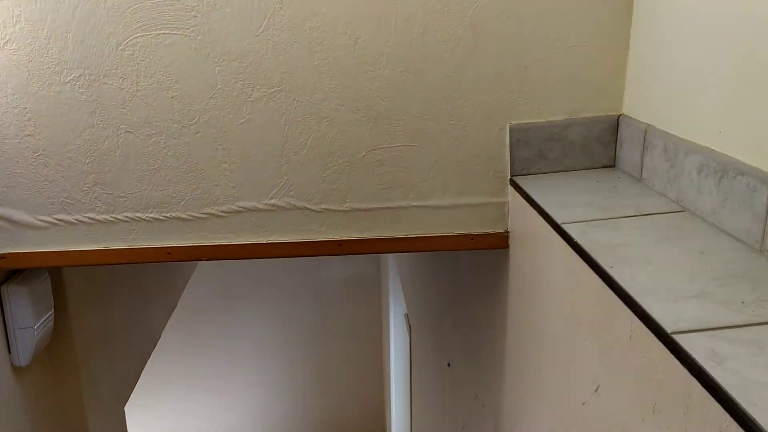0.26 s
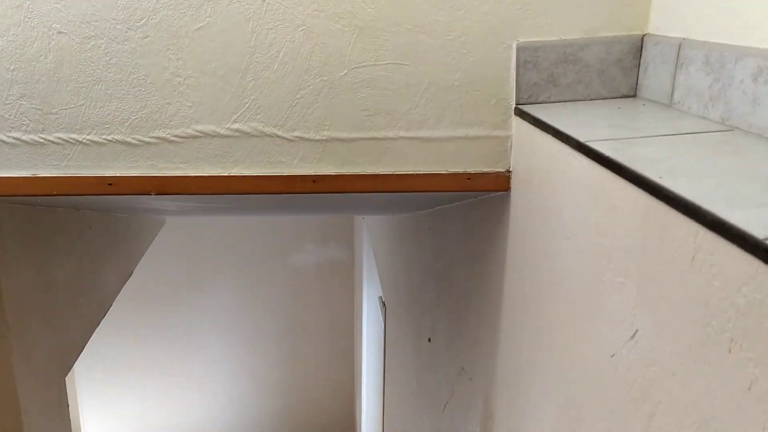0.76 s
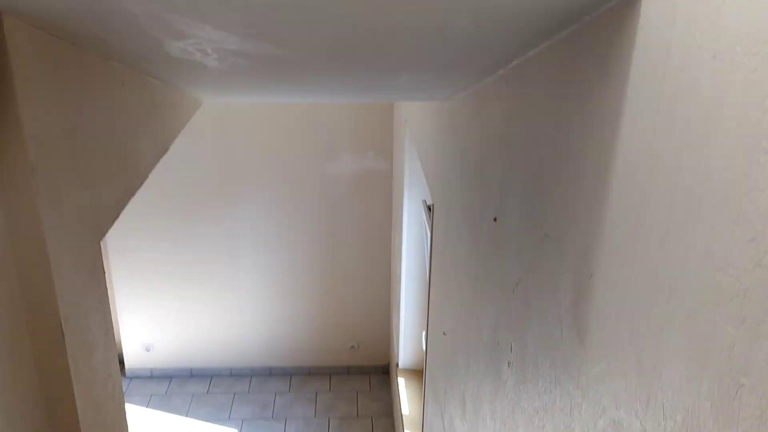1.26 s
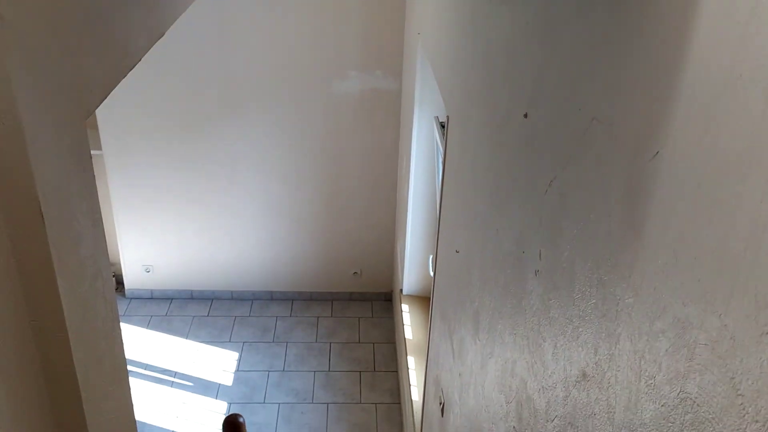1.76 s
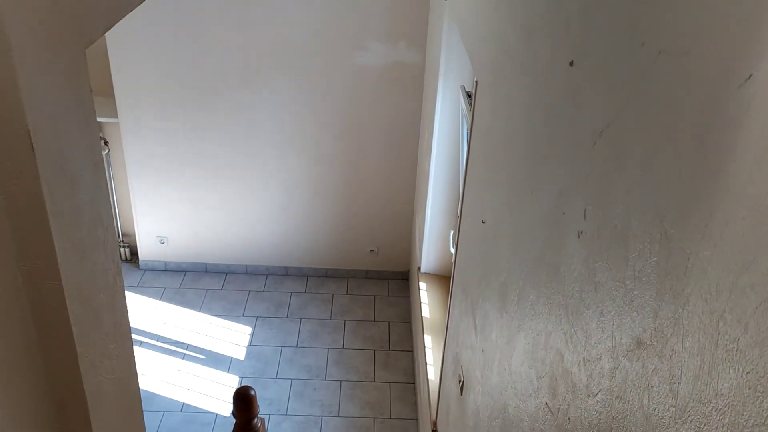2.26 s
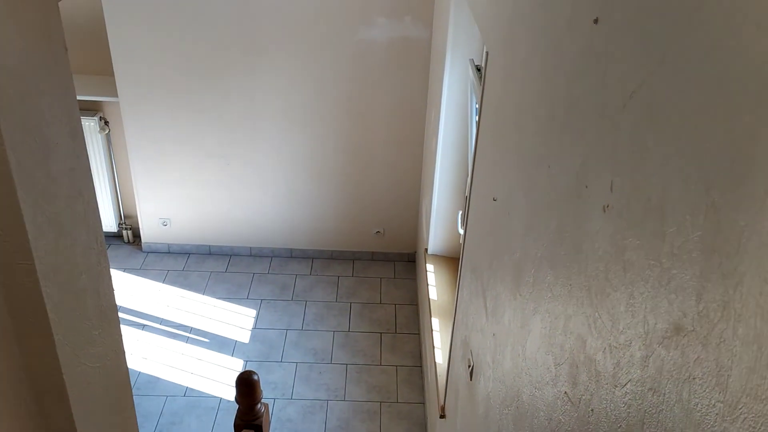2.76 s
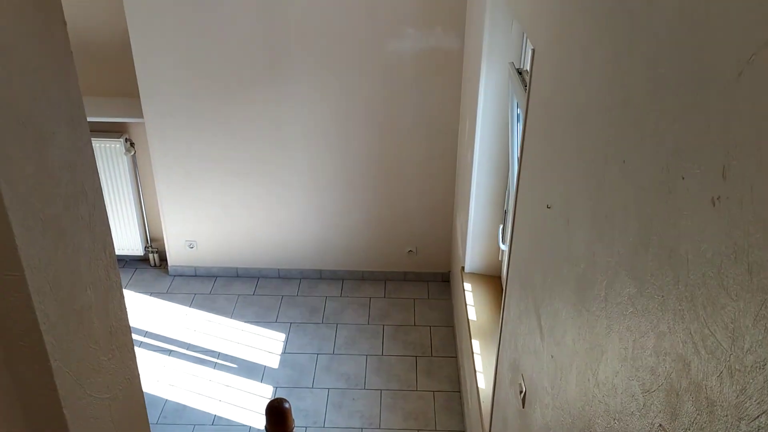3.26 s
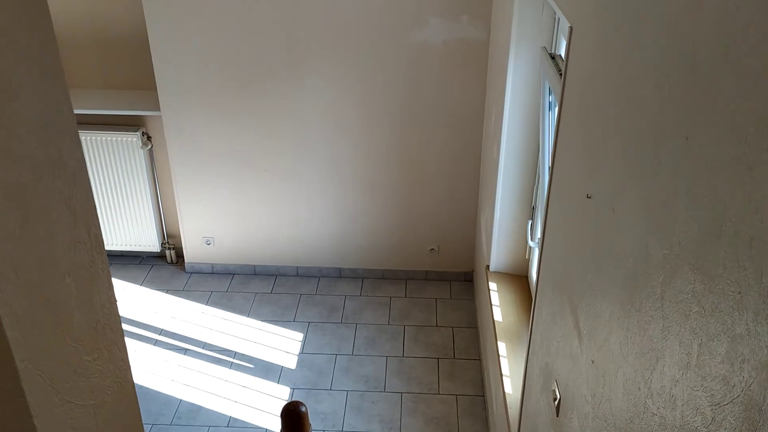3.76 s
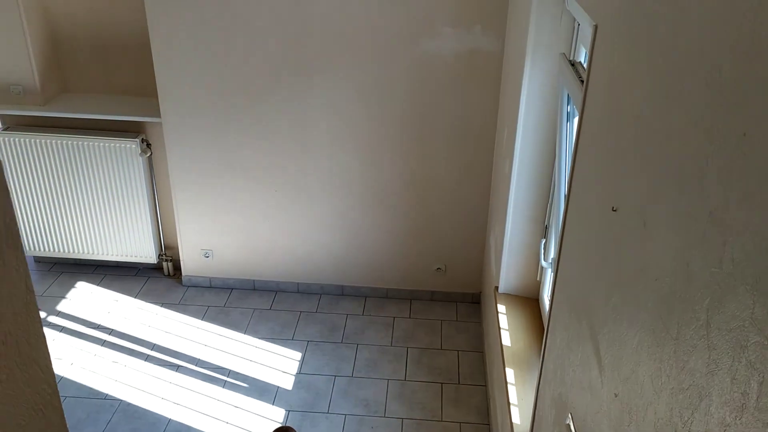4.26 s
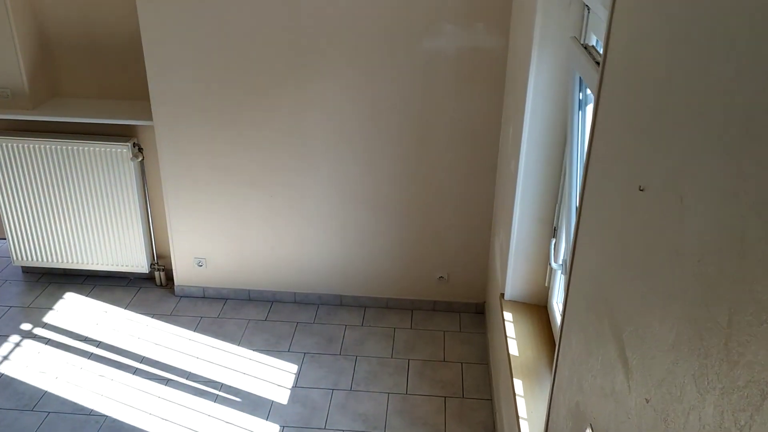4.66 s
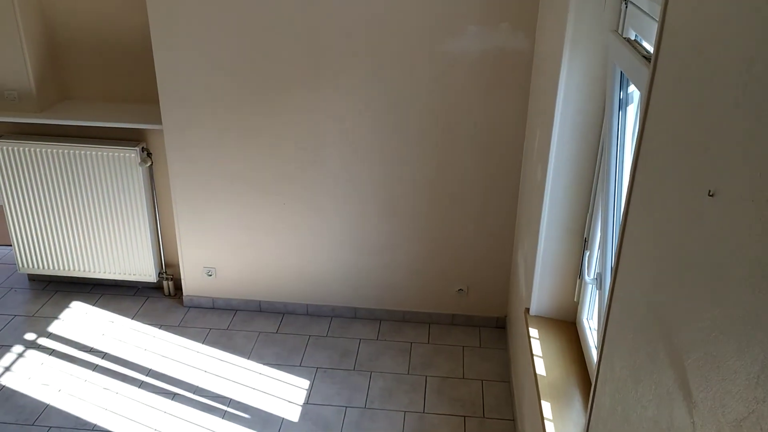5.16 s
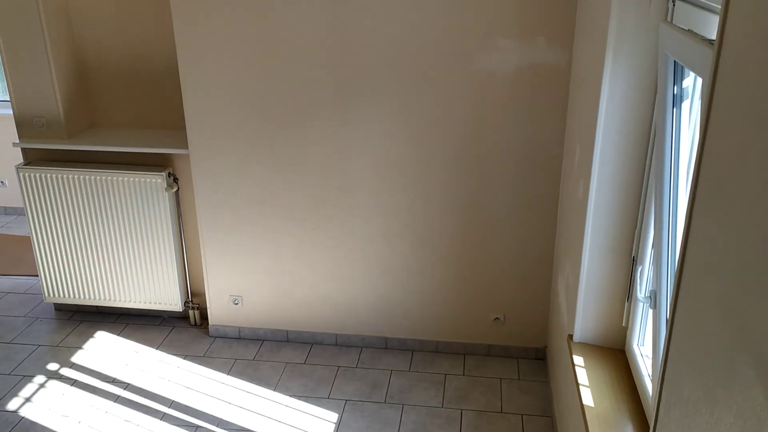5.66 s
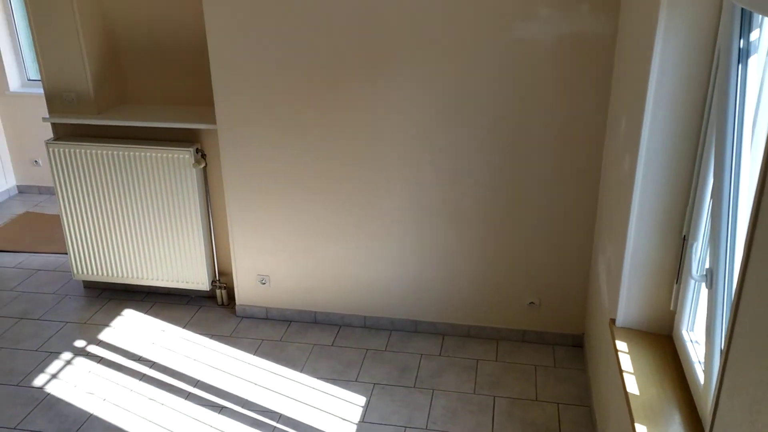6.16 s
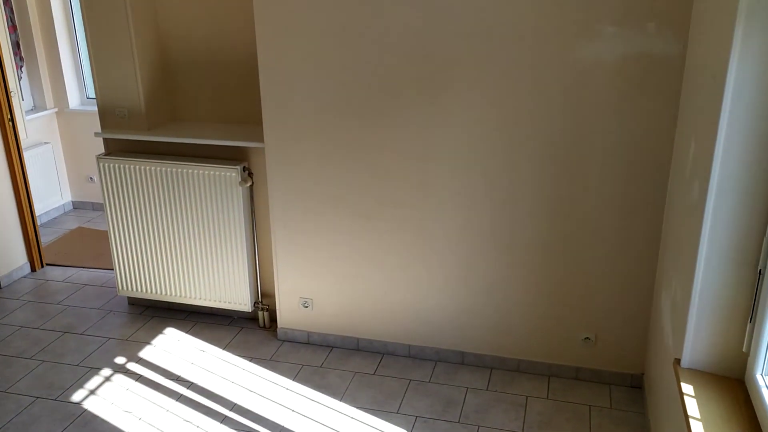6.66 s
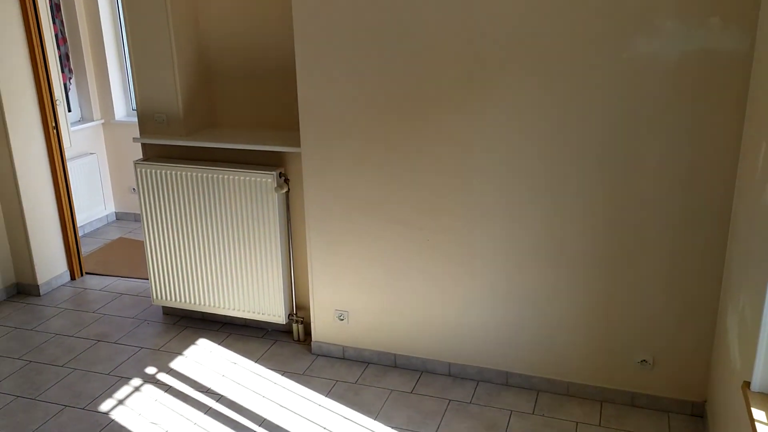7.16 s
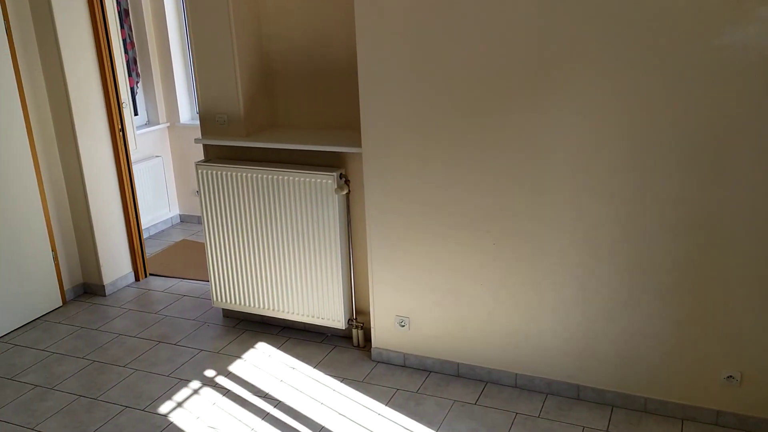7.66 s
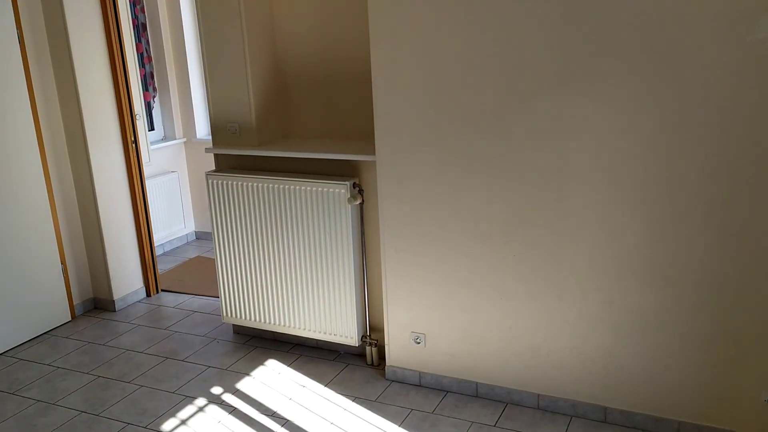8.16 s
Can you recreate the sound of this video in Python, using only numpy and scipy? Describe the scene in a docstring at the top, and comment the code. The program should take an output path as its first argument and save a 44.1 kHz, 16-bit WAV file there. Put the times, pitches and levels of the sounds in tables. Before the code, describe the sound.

Slow shoe steps descend a tiled staircase in a bare, echoing stairwell, toe tap then dull heel knock, with trouser swish and a tiny early metal clink.

```python
"""A bare, echoing stairwell with hard floor and walls close by, heard through a pair of microphones.
Someone walks slowly down its tiled staircase: a bright tap of the toe and, some 40 ms later, the dull
knock of the heel, each a shaped pulse sent through echoes of decaying noise; tread, shoe and tile ring.
Trousers swish as filtered noise with each swing of the leg; the shoes tick, scuff and thud softly.
Early on, a small piece of metal is struck, two light ticks and a clink of a few decaying sines; quiet
house noise lies underneath."""
import sys
import numpy as np
from scipy import signal
from scipy.fft import rfft, irfft, next_fast_len
from scipy.io import wavfile
from scipy.ndimage import uniform_filter1d

SR = 44100
rng = np.random.default_rng(int(sys.argv[2]) if len(sys.argv) > 2 else 0)


def to_wav(sig):
    """Store sig (one row per channel, or 1-D mono) as 16-bit WAV at the path in sys.argv[1].

    Samples outside -1..1 are clipped; the rate is SR.
    """
    pcm = np.clip(np.atleast_2d(sig), -1, 1) * 32767
    pcm = np.round(pcm).astype(np.int16)
    wavfile.write(sys.argv[1], SR, pcm.T)  # frames by channels


N = 370652
PULSE_SIZE, TAIL_SIZE = 8192, 32768   # samples in a contact pulse and in an echo response


def from_db(db):
    """Amplitude factor of a level in dB."""
    return 10 ** (np.asarray(db) / 20)


def at_hz(points, hz):
    """Read (f/Hz, value) points on a log-frequency axis."""
    points = np.array(points)
    return np.interp(np.log(hz + 1e-6), np.log(points[:, 0]), points[:, 1])


def bins(size):
    """Frequencies in Hz of a real spectrum."""
    return np.arange(size // 2 + 1) * SR / size


def add(out, s, sound):
    """Mix a stereo sound in at time s; whatever falls before the start is cut off."""
    start = round(s * SR)
    part = sound[:, max(-start, 0):N - start]
    first = max(start, 0)
    out[:, first:first + part.shape[1]] += part


def uneven(count, size):
    """A smooth random row of spread 1."""
    row = uniform_filter1d(rng.standard_normal(count), size)
    row = uniform_filter1d(row, size)
    return row / row.std()


# width of the sound field at the microphone pair: f/Hz, side over mid/dB
FIELD_WIDTH = [(60, -15.5), (125, -27), (250, -10), (500, -8.5), (1000, 0.5), (2000, 0.5), (12000, 0)]


def diffuse(size):
    """Spectrum of white noise arriving from all sides: nearly alike in both channels in the bass only."""
    mid, side = rfft(rng.standard_normal((2, size)))
    side_gain = from_db(at_hz(FIELD_WIDTH, bins(size)))
    return mid + side * side_gain * np.array([[1], [-1]])


def coloured_noise(spectrum):
    """Diffuse noise with the given spectrum; its mid has rms 1."""
    size = next_fast_len(N)
    shaped = diffuse(size) * from_db(at_hz(spectrum, bins(size)))
    noise = irfft(shaped, size)[:, :N]
    return noise / noise.mean(axis=0).std()


def pulse(gain_db):
    """The most compact causal pulse with this spectrum (minimum phase)."""
    cepstrum = irfft(np.log(from_db(gain_db)))
    # fold the cepstrum onto positive times
    cepstrum[1:PULSE_SIZE // 2] *= 2
    cepstrum[PULSE_SIZE // 2 + 1:] = 0
    return irfft(np.exp(rfft(cepstrum)))


def dying(t, t60):
    """Exponential decay of unit energy, falling 60 dB in t60 seconds."""
    fall = np.exp(-np.log(1000) * t / t60)
    return fall / np.sqrt(np.sum(fall ** 2))


def resonance(hz, width_hz, height_db):
    """A resonance, as a bump in dB."""
    offset = (bins(PULSE_SIZE) - hz) / (width_hz / 2)
    return height_db / (1 + offset ** 2)


def ripple(depth_db):
    """Many weak resonances, different at every contact and fading out in the bass."""
    hz = bins(PULSE_SIZE)
    return depth_db * uneven(len(hz), size=30) * hz / (hz + 600)


def slap(level_db, t60, low_hz):
    """Surfaces meet patch by patch: a short burst of dying noise above low_hz."""
    burst = irfft(diffuse(TAIL_SIZE), TAIL_SIZE) * dying(np.arange(TAIL_SIZE) / SR, t60)
    low_cut = signal.butter(2, low_hz, "high", fs=SR, output="sos")
    return from_db(level_db) * signal.sosfilt(low_cut, burst + 1e-18)


# the stairwell by band: f/Hz, early echoes/dB, early t60/s, late tail/dB, tail t60/s
STAIRWELL_BANDS = [(60, -2, 0.24, -2.5, 0.84), (125, 0, 0.28, -5, 0.65), (224, -2.5, 0.17, -7.5, 0.68),
                   (530, -2.5, 0.11, -3.5, 0.8), (1130, -5, 0.27, -3.5, 1), (2210, -7.5, 0.14, -2, 1),
                   (4400, -7, 0.14, -1, 0.88), (9150, -5.5, 0.2, -4.5, 0.95), (14100, 0, 0.14, -18, 0.31)]
# hard floor and walls close by, roughly 1 to 3.6 m of extra path: delay/s, level/dB
NEAR_SURFACES = [(.0028, -9.5), (.0046, -2), (0.0105, -1.5)]


def stairwell(direct_db, early_db, tail_db, pan_db, build_s=.011, modes_db=2.0):
    """Response from one spot: straight sound, first reflections, a flurry off the walls, then a long tail."""
    t, pitch = np.arange(TAIL_SIZE) / SR, np.log(bins(TAIL_SIZE) + 1)
    # each spot excites some standing waves more than others
    field = diffuse(TAIL_SIZE) * from_db(modes_db * uneven(len(pitch), size=8))
    out, build_up = np.zeros((2, TAIL_SIZE)), 1 - np.exp(-t / build_s)
    centres = np.log(np.array(STAIRWELL_BANDS)[:, 0])
    for own, (_, near_db, near_t60, far_db, far_t60) in zip(np.eye(len(STAIRWELL_BANDS)), STAIRWELL_BANDS):
        # neighbouring bands crossfade
        band = irfft(field * np.interp(pitch, centres, own), TAIL_SIZE)
        early = from_db(early_db + near_db) * dying(t, near_t60)
        tail = from_db(tail_db + far_db) * dying(t, far_t60) * build_up
        out += band * (early + tail)
    out[:, 0] += from_db(direct_db + np.array([pan_db, -pan_db]) / 2)
    for delay_s, level_db in NEAR_SURFACES:
        # paths change from contact to contact and reach the two microphones a little apart
        lag = SR * delay_s * rng.uniform(.85, 1.15) + rng.uniform(-10.0, 6, 2)
        out[[0, 1], np.abs(lag).astype(int)] += from_db(direct_db + level_db)
    return out


def broad_colour(response):
    """Level of a response in dB, averaged over narrow bands."""
    power = np.cumsum(np.abs(rfft(response.mean(axis=0))) ** 2)
    hz, fine = bins(PULSE_SIZE), bins(TAIL_SIZE)
    reach = 12 + .05 * hz
    low, high = np.maximum(hz - reach, 0), np.minimum(hz + reach, SR / 2)
    band_power = np.interp(high, fine, power) - np.interp(low, fine, power)
    mean = band_power / ((high - low) / fine[1])
    return 10 * np.log10(mean + 1e-12)


# resonances of the staircase that colour every contact: f/Hz, width/Hz, height/dB
STAIRCASE_RESONANCES = [(108.4, 19, 3.5), (202.5, 4.5, 2), (281.5, 48, 2.5), (468, 70, 2.5), (630, 134, 2),
                        (2410, 200, 1.5), (3650, 490, 2.5)]


def blow(gain_db, response):
    """One contact at the microphones: echoes spread it in time, gain_db and the staircase set its colour."""
    staircase_db = sum(resonance(*mode) for mode in STAIRCASE_RESONANCES)
    heard_db = gain_db + staircase_db - broad_colour(response)
    return -signal.fftconvolve(response, pulse(heard_db)[None], axes=1)   # the pressure dips first


def shelves(weight_db, bass_hz, hardness_db, treble_hz, top_hz):
    """Weight on the foot lifts the bass, a hard landing the treble up to top_hz; in dB."""
    corners = (bass_hz, treble_hz, top_hz)
    bass, below_treble, below_top = (1 / (1 + (bins(PULSE_SIZE) / hz) ** 4) for hz in corners)
    return weight_db * bass + hardness_db * (below_top - below_treble)


# echo against straight sound; it dips, then grows as the narrow stairs open into the room: t/s, level/dB
ECHO_OPENNESS = [(0.4, -0.5), (2.0, -3.5), (5.5, -3), (6.3, 1), (7.9, 4)]


def footfalls(table, spectrum, bass_hz, treble_hz, top_hz, boom_db, boom_width_hz,
              shoe_hz, shoe_db, shoe_width_hz, ring_db, ring_q, ripple_db, slap_db, slap_t60,
              direct_db, early_db, tail_db, echo_share, pan_db):
    """Weight and hardness colour each landing; the tread booms, shoe and tile ring."""
    out, hz = np.zeros((2, N)), bins(PULSE_SIZE)
    usual_db = at_hz(spectrum, hz) + resonance(shoe_hz, shoe_width_hz, shoe_db)
    for s, level_db, weight_db, hardness_db, boom_hz, *rings_hz in table:
        gain_db = usual_db + level_db + ripple(ripple_db)
        gain_db += shelves(weight_db, bass_hz, hardness_db, treble_hz, top_hz)
        gain_db += resonance(boom_hz, boom_width_hz, boom_db)
        gain_db += sum(resonance(ring_hz, ring_hz / ring_q, ring_db) for ring_hz in rings_hz)
        # the open room gives less straight sound and more echo
        echo_db = echo_share * np.interp(s, *np.transpose(ECHO_OPENNESS))
        response = stairwell(direct_db - echo_db, early_db, tail_db + echo_db / 2, pan_db)
        response += slap(slap_db - echo_db, slap_t60, low_hz=360)
        add(out, s, blow(gain_db, response))
    return out


# heel landings, the first just before the start:
# t/s, level/dB, weight as bass/dB, hardness as treble/dB, tread boom f/Hz, lower and upper tile ring f/Hz
HEEL_LANDINGS = [(-0.13, -3.5, -7, 10, 200, 1100, 1390), (0.399, -4.5, -1, 0, 176, 720, 1090),
                 (1.137, 3, -1, -3, 206, 746, 1190), (2.0703, .5, 1, 1.5, 218, 710, 1790),
                 (3.1112, 1, 5, -2.5, 224, 654, 2460), (4.002, 1.5, 5, 1.4, 109, 774, 1043),
                 (4.7442, 2.5, 2.5, 3, 190, 1040, 2220), (5.509, 3.5, 0, 3, 211, 477, 2120),
                 (6.315, 1.5, -3, 4, 277, 910, 1440), (7.1982, -2, -7, 1.2, 327, 714, 1206),
                 (7.9735, -0.5, -6, -3.5, 196, 807, 1420)]
# colour of a usual knock: f/Hz, level/dB
HEEL_COLOUR = [(30, 13), (55, 21), (110, 26.5), (220, 31), (390, 20.5), (700, 17.5), (1250, 17.5),
               (1700, 7.5), (2400, 5), (3200, -4.5), (5500, -13), (10000, -11), (13000, -15.5),
               (16000, -32)]


def heels():
    """The rubber heel comes down under the full weight: a dull knock."""
    return footfalls(HEEL_LANDINGS, HEEL_COLOUR, bass_hz=170, treble_hz=1450, top_hz=5500,
                     boom_db=3.5, boom_width_hz=41, shoe_hz=1280, shoe_db=1.0, shoe_width_hz=140,
                     ring_db=5.0, ring_q=16.7, ripple_db=3.0, slap_db=-8.0, slap_t60=0.038,
                     direct_db=-11, early_db=-2.5, tail_db=-2.5, echo_share=.98, pan_db=1.5)


# colour of the quiet house: f/Hz, level/dB per Hz
HOUSE_COLOUR = [(18, -45), (30, -25), (45, 1), (58, 7), (89, -4.5), (130, -10.5), (335, -11), (500, -15),
                (1000, -16), (1600, -21.5), (2500, -21.5), (3500, -43), (5700, -50), (11000, -49),
                (16000, -44)]


def quiet_house(level_db=-56):
    """Steady diffuse noise of the house, strongest in the bass."""
    return from_db(level_db) * coloured_noise(HOUSE_COLOUR)


# toe landings: t/s, level/dB, weight as bass/dB, hardness as treble/dB, tread boom f/Hz, tile ring f/Hz
TOE_LANDINGS = [(0.3464, 6.5, -5, -9.5, 164, 2250), (1.1053, 1, -2, 2, 133, 2260),
                (2.0276, -2, 1.5, -7.5, 98, 2900), (3.075, -2.5, -1, 2.5, 100, 3650),
                (3.9564, 3.5, 1, -2, 113, 2260), (4.7051, 5, -3.5, 1.5, 106, 3620),
                (5.4655, -1.5, 9.5, 0.5, 207, 2410), (6.28, 0.5, -2.5, -1, 197, 3520),
                (7.1465, -3, 6, 2, 198, 2360), (7.931, -0.5, 3, 0, 185, 4400)]
# a leg swings forward until its toe lands: start t/s, swish level/dB
LEG_SWINGS = [(0.051, -54.5), (0.45, -57.5), (1.45, -61.5), (2.45, -58), (3.72, -53.5), (4.1, -55),
              (5.05, -56), (5.6, -59.5), (6.85, -59.5), (7.38, -56.5)]


def swishing(attack_s=0.21, hold_s=0.057, release_s=0.39, rest_db=-63):
    """Strength of the rubbing: it swells with each swing and fades soon after the toe has landed."""
    t = np.arange(N) / SR
    strength = from_db(rest_db)   # faint rubbing of the cloth between swings
    for (start_s, level_db), (landing_s, *_) in zip(LEG_SWINGS, TOE_LANDINGS):
        attack = np.clip((t - start_s) / attack_s, 0, 1)
        release = np.clip(1 - (t - landing_s - hold_s) / release_s, 0, 1)
        strength = np.maximum(strength, from_db(level_db) * attack * release)
    return strength


# colour of the cloth: f/Hz, level/dB per Hz
CLOTH_COLOUR = [(500, 0.5), (1500, -8), (3000, -4.5), (4200, -1), (5700, -6), (7500, 0), (10500, 2.5),
                (13000, -3), (15000, -4.5), (16000, -14)]


def trousers(cloth_db=1.17, grain_db=0.5, patchy_db=2.6):
    """Cloth hisses as the legs pass, grainy from the weave catching, its colour shifting with the folds."""
    catch = uniform_filter1d(rng.standard_normal(N), size=200)
    cells = signal.stft(coloured_noise(CLOTH_COLOUR), nperseg=1024)[2]
    # smooth random patches over frequency and time
    folds = uniform_filter1d(rng.standard_normal(cells.shape[1:]), size=7, axis=0)
    folds = uniform_filter1d(folds, size=7, axis=1)
    hiss = signal.istft(cells * from_db(patchy_db * folds / folds.std()))[1][:, :N]
    grain = from_db(cloth_db + grain_db * catch / catch.std())
    return swishing() * grain * hiss


# weight shifts on a tread: t/s, level/dB, boom f/Hz
WEIGHT_SHIFTS = [(0.064, 3.5, 223), (0.833, -13, 380), (1.923, -8, 215), (2.98, -16, 129),
                 (4.529, -16, 102), (4.627, -10, 211), (5.121, -10, 203), (5.252, 5, 203)]
# colour of a thud: f/Hz, level/dB
THUD_COLOUR = [(40, -18), (110, 13), (210, 11), (330, 7.5), (450, -2), (750, -1), (1300, -17.5),
               (3000, -28), (16000, -50)]


def thuds():
    """Soft, dull bumps as the weight moves over the foot."""
    out, usual_db = np.zeros((2, N)), at_hz(THUD_COLOUR, bins(PULSE_SIZE))
    for s, level_db, boom_hz in WEIGHT_SHIFTS:
        gain_db = usual_db + level_db + resonance(boom_hz, width_hz=37, height_db=11.5)
        response = stairwell(direct_db=-5.5, early_db=-3.5, tail_db=1, pan_db=0.5)
        add(out, s, blow(gain_db, response))
    return out


# light ticks: the first two are the small metal piece being struck, the rest the shoes flexing
# or leaving the tile: t/s, level/dB, brightness/dB per octave
LIGHT_TICKS = [(0.145, 3, -0.5), (0.257, -3.5, -3.5), (0.959, -3, 0.5), (1.479, -2.5, 0.5), (2.474, -5, 0),
               (3.426, -8.5, 5.5), (3.506, -2, -.5), (4.385, 1, -0.5), (5.129, -1.5, 0), (5.836, 0.5, 1),
               (6.993, -5.5, -0.5), (8.302, -9.5, -2.5)]
# colour of a tick: f/Hz, level/dB
TICK_COLOUR = [(100, -8), (700, -11.5), (2400, -13), (4000, -16.5), (6000, -19), (10000, -14.5),
               (16000, -30)]


def ticks():
    """Light, dry ticks: first the metal piece struck twice, then the shoes flexing or leaving the tile."""
    out, hz = np.zeros((2, N)), bins(PULSE_SIZE)
    octaves = np.log2(np.maximum(hz, 500) / 5000)
    for s, level_db, brightness in LIGHT_TICKS:
        gain_db = at_hz(TICK_COLOUR, hz) + level_db + brightness * octaves + ripple(depth_db=3.5)
        response = stairwell(direct_db=-16.5, early_db=-8.5, tail_db=-1, pan_db=-2)
        response += slap(-6.5, t60=0.029, low_hz=350)
        add(out, s, blow(gain_db, response))
    return out


# ringing of the small metal piece, perhaps a zip pull, from its first strike: t/s, level/dB
METAL_RINGS = [(0.145, -39)]
# its modes: f/Hz, level/dB, t60/s
METAL_MODES = [(7235, -1.5, .49), (7253, -4, .49), (9195, -7, .42), (9900, -11, .1), (11710, -11, .36),
               (12950, -14, .2), (13600, -11, .09), (14930, -5, .33), (15200, -10, .1)]


def clink():
    """Thin metal rings in a few high modes, each reaching the two microphones in a phase of its own."""
    out, t = np.zeros((2, N)), np.arange(TAIL_SIZE) / SR
    ring = np.zeros((2, TAIL_SIZE))
    for hz, db, t60 in METAL_MODES:
        phase = rng.normal(0, 1.0, (2, 1))
        ring += from_db(db - 60 * t / t60) * np.sin(2 * np.pi * hz * t + phase)
    for s, level_db in METAL_RINGS:
        add(out, s, from_db(level_db) * ring)
    return out


# colour of a usual tap: f/Hz, level/dB
TOE_COLOUR = [(30, 5), (60, 7), (110, 20.5), (220, 17), (400, 3.5), (700, 4), (1250, 2), (1700, 0),
              (2400, 2), (3200, -1.5), (5500, -1), (10000, -3.5), (13000, -15.5), (16000, -35)]


def toes():
    """The sole's tip slaps the tile: a bright tap."""
    return footfalls(TOE_LANDINGS, TOE_COLOUR, bass_hz=404, treble_hz=3420, top_hz=16000,
                     boom_db=11.5, boom_width_hz=27, shoe_hz=1600, shoe_db=1.0, shoe_width_hz=210,
                     ring_db=3.5, ring_q=5.8, ripple_db=2.5, slap_db=-4.0, slap_t60=0.03,
                     direct_db=-12.0, early_db=-2, tail_db=-4.0, echo_share=0.65, pan_db=-1.0)


# the sole slides a little on the tile: t/s, level/dB, length/s, hiss centre f/Hz
SOLE_SLIDES = [(0.354, -40, 0.044, 2480), (0.4, -41, 0.021, 12500), (2.06, -47, 0.036, 9600),
               (3.958, -44, 0.022, 4000), (4.711, -54, 0.025, 3800), (5.469, -43, 0.023, 8540),
               (6.276, -49, 0.022, 10000), (7.941, -42, 0.046, 6000)]


def scuffs(width_hz=2500):
    """Grit under the sliding sole: a short swell of tiny uneven clicks."""
    out = np.zeros((2, N))
    for s, level_db, length_s, hiss_hz in SOLE_SLIDES:
        size = int(max(length_s, .005) * SR)
        grit = rng.standard_normal(size) ** 3 * np.hanning(size)   # cubing makes a few clicks stand out
        response = stairwell(direct_db=-7, early_db=-3, tail_db=-0.5, pan_db=-4)
        hiss = blow(resonance(hiss_hz, 2 * width_hz, height_db=11.5), response)
        sound = signal.fftconvolve(hiss, grit[None], axes=1)
        add(out, s, from_db(level_db) * sound / sound[:, :size].std())
    return out


def scene():
    """The walk down the stairs over the quiet house."""
    landings = heels() + toes()
    small_contacts = thuds() + ticks() + scuffs() + clink()
    return landings + small_contacts + trousers() + quiet_house()


# colour difference of the two microphones: f/Hz, left over right/dB
MICROPHONE_BALANCE = [(60, 0.0), (110, -0.5), (200, 1.5), (380, 0), (700, 0), (1290, -2.0), (2380, -4.5),
                      (4400, -0.5), (8120, 0.5), (15000, 0)]


def record(dry, low_cut_hz=30, cutoff_hz=16200):
    """The two microphones differ a little in colour; rumble and the very top are cut."""
    size = next_fast_len(N + PULSE_SIZE)
    lean = from_db(at_hz(MICROPHONE_BALANCE, bins(size)) * np.array([[.5], [-.5]]))
    heard = irfft(rfft(dry, size) * lean, size)[:, :N]
    low_cut = signal.butter(4, low_cut_hz, "high", fs=SR, output="sos")
    top_cut = signal.ellip(10, .1, 80, cutoff_hz, fs=SR, output="sos")
    return signal.sosfilt(top_cut, signal.sosfilt(low_cut, heard))


dry = scene()
out = record(dry)
to_wav(out)
```